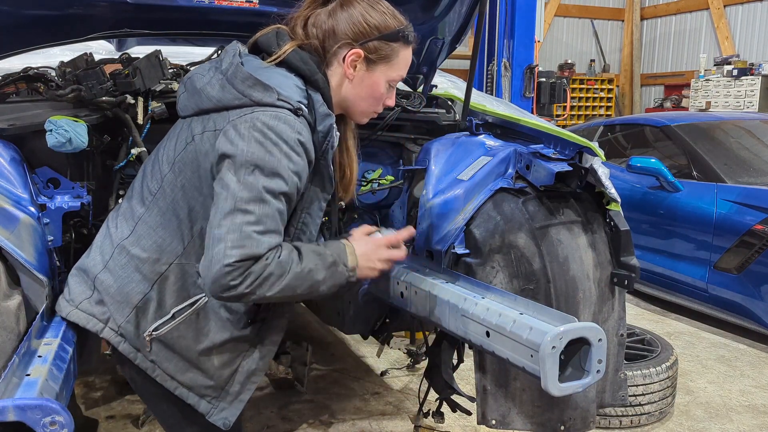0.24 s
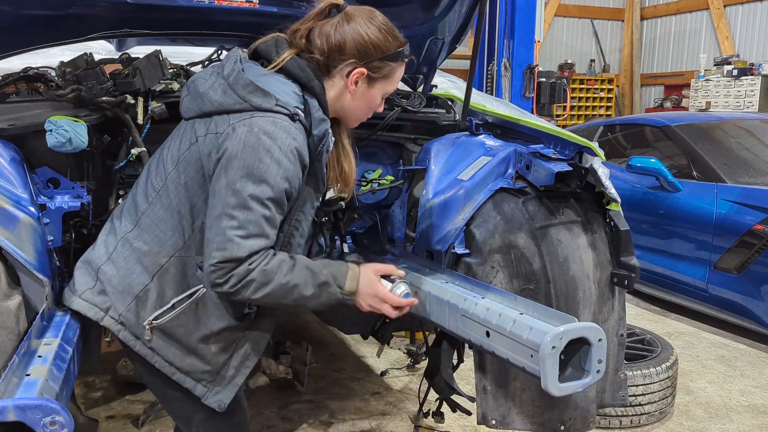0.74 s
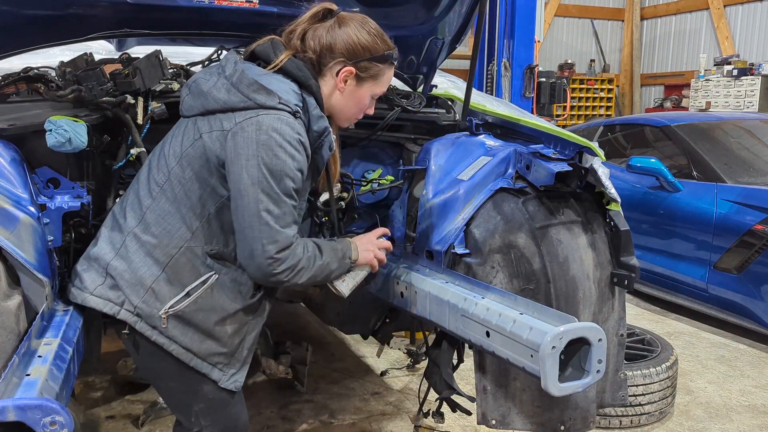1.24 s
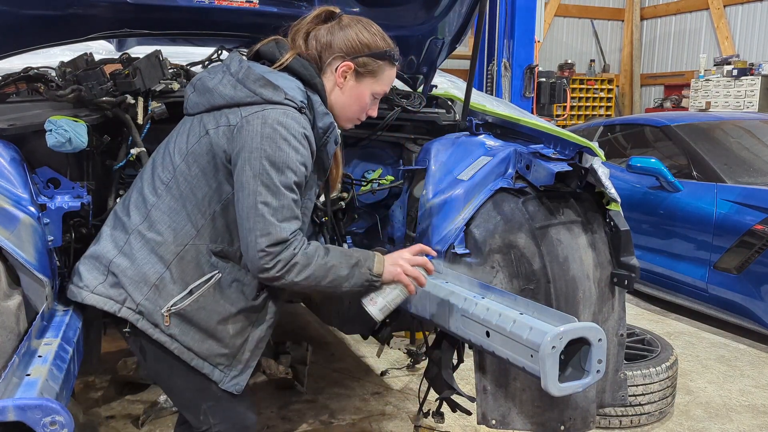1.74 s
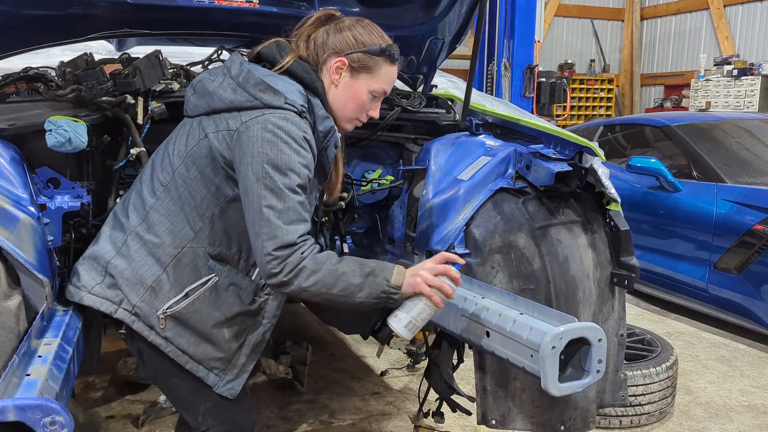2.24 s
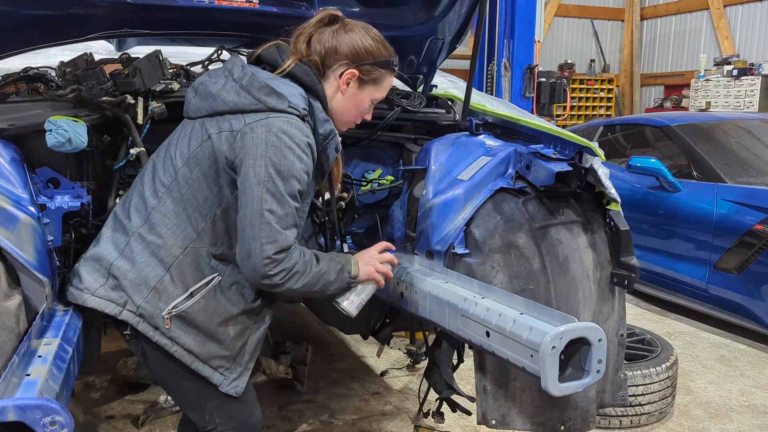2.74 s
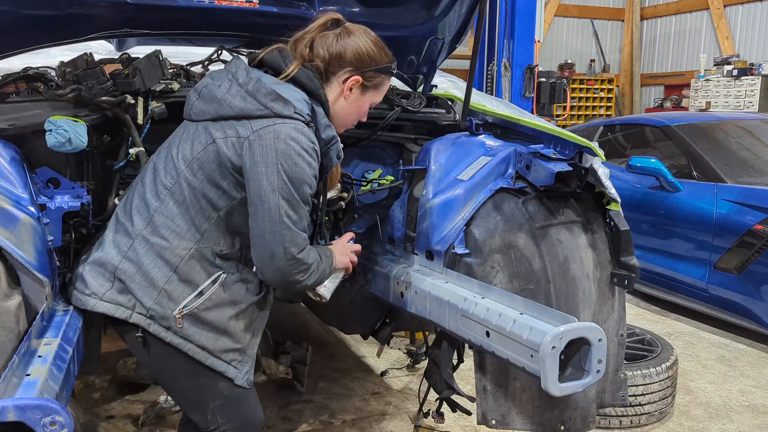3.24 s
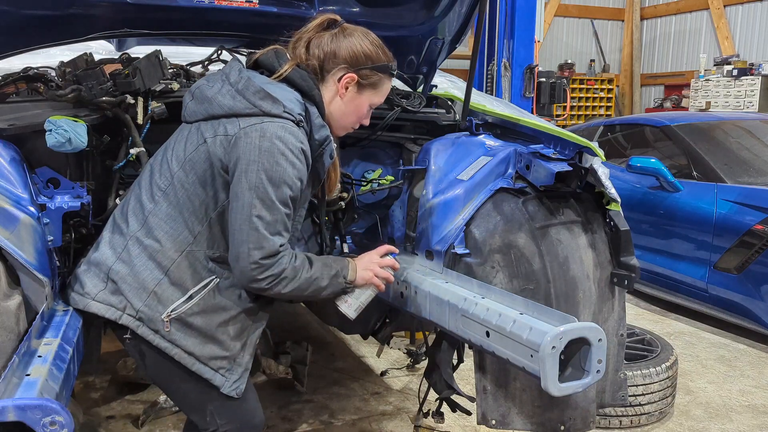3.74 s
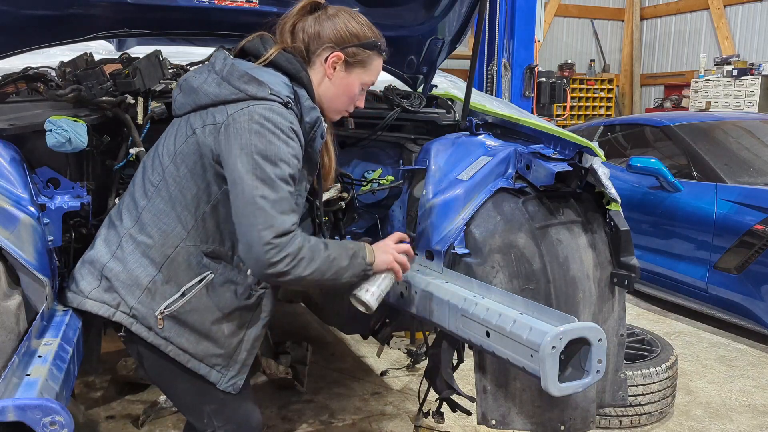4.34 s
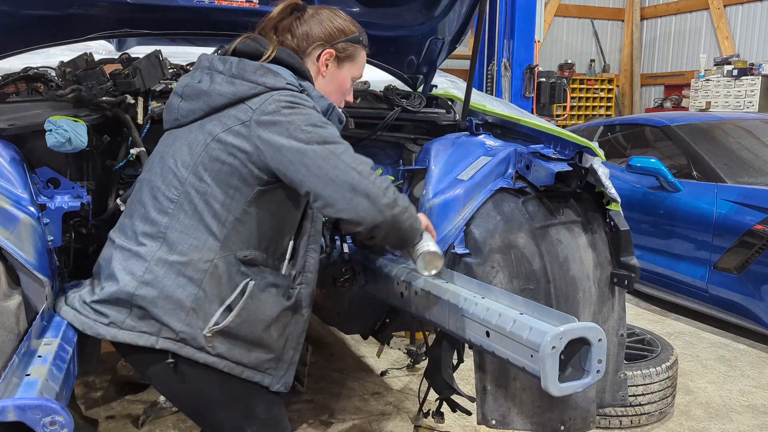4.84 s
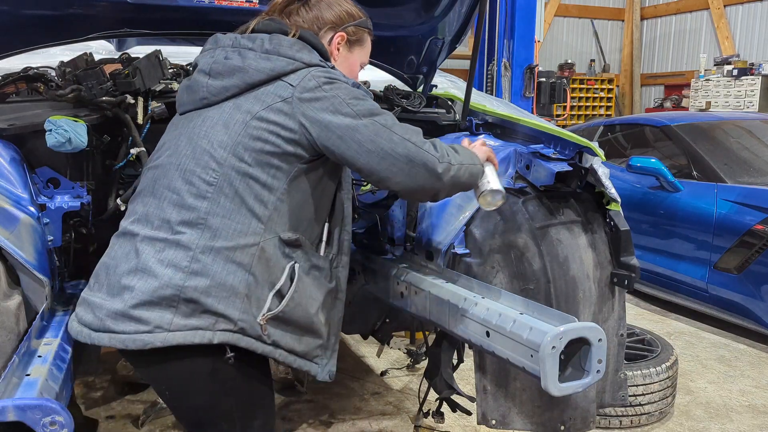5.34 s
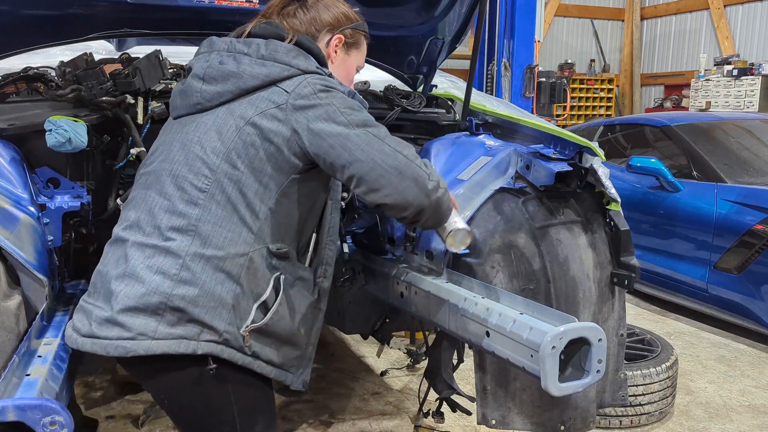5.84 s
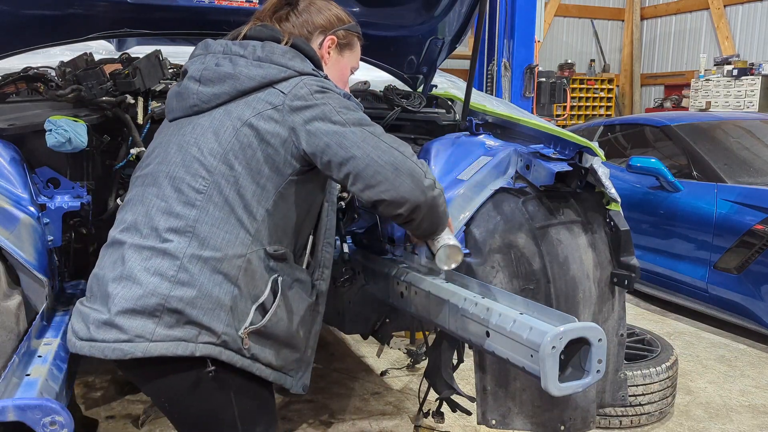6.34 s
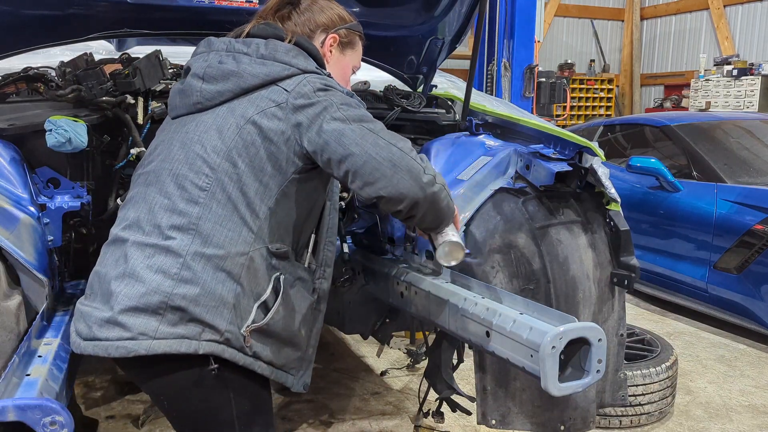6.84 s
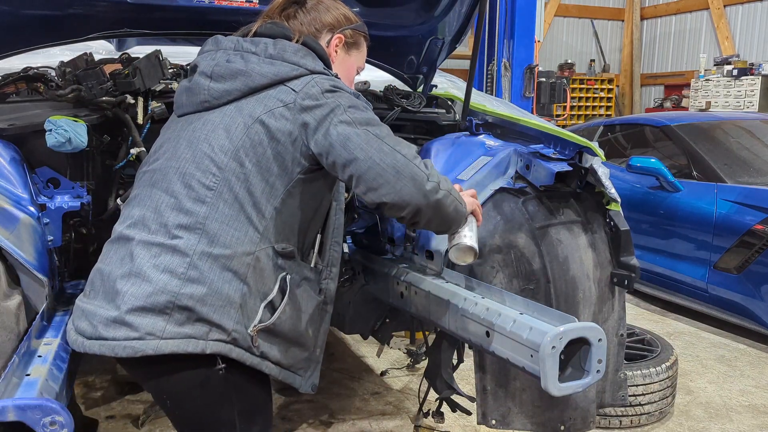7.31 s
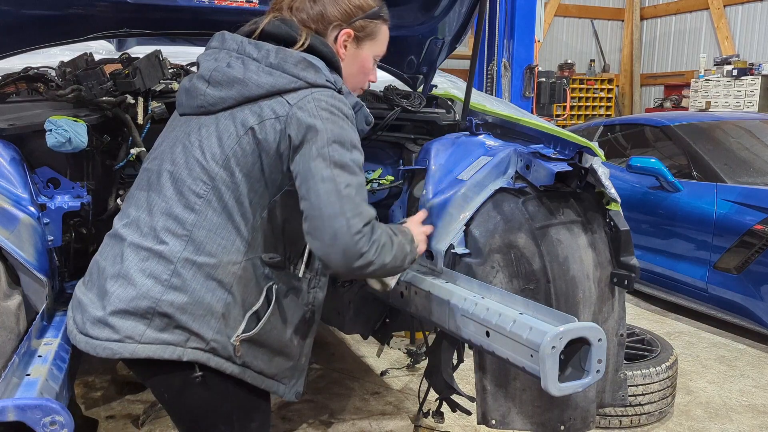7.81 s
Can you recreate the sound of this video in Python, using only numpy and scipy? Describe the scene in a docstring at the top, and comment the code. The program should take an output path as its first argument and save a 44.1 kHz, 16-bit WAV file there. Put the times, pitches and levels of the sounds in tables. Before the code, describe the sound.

Close stereo microphones catch hard, bright clacks from a shaken spray can, with quick reflections from nearby surfaces and a ringing hall tail. A final clack and tiny bounces lead into breathy, slightly fluttering paint bursts separated by short pauses. Dull shoe bumps occur between and under them. After the last short puff, scuffing soles and faint clothing ticks remain over a steady low room rumble.

```python
"""An aerosol paint can is shaken in a large workshop, its mixing pea clacking on the tin, then sprayed
in eight hissing bursts at a steel beam. Each clack is a dispersed blow with a faint ring of the tin.
The painter shifts her feet, with damped noise for soles on concrete, and her jacket rustles and ticks.
The floor and the car close by reflect each clack, the hall rings on, and a low rumble lies under it all."""
import sys
import numpy as np
from scipy import signal
from scipy.fft import rfft, irfft, next_fast_len
from scipy.io import wavfile
from scipy.ndimage import uniform_filter1d, map_coordinates

SR = 44100
rng = np.random.default_rng(int(sys.argv[2]) if len(sys.argv) > 2 else 0)


def wrap_up_sound(samples):
    """Save the sound to the file named by the first command line argument, as 16-bit audio."""
    columns = np.atleast_2d(samples).T
    # keep every value between -1 and 1, then stretch to whole-number steps
    tamed = np.clip(columns, -1, 1)
    steps = np.round(tamed * 32767).astype(np.int16)
    wavfile.write(sys.argv[1], SR, steps)


N = 355887  # samples in the scene


def amp(db):
    """Decibels to gain."""
    return 10 ** (np.asarray(db) / 20)


def unit(x):
    """Scaled to rms 1."""
    return x / np.sqrt(np.mean(x ** 2) + 1e-20)


def along(points, hz):
    """Values of (Hz, value) points, interpolated on a log frequency axis."""
    f, v = np.transpose(points)
    return np.interp(np.log(hz + 1), np.log(f + 1), v)


def wobble(rate):
    """A smooth random curve through rate random knots a second."""
    knots = rng.standard_normal(int(N * rate / SR) + 4)
    return map_coordinates(knots, [np.arange(N) * rate / SR])


def filtered(x, response):
    """x shaped by a response, given as a function of frequency in Hz."""
    m = next_fast_len(x.shape[-1] + 8192)  # spare room for the filter's ringing
    spectrum = rfft(x, m) * response(np.fft.rfftfreq(m, 1 / SR))
    return irfft(spectrum, m)[..., :x.shape[-1]]


def resonance(f, centre, width):
    """Response of one damped resonance."""
    return 1j * f * width / (centre ** 2 - f ** 2 + 1j * f * width)


def pulse(gain, size=1024):
    """The shortest causal (minimum-phase) click with the given gain over frequency."""
    cepstrum = irfft(np.log(gain(np.fft.rfftfreq(size, 1 / SR)) + 1e-9))
    folded = np.r_[cepstrum[0], 2 * cepstrum[1:size // 2]]
    return irfft(np.exp(rfft(folded, size)))


def diffuse(n):
    """Noise arriving from all around: alike left and right in the bass, nearly unrelated in the treble."""
    # Each row: frequency in Hz, likeness of left and right (1 is identical)
    alike = [(60, 0.96), (130, 0.94), (290, 0.82), (640, 0.32), (1400, 0.076), (7000, 0.045)]

    def mid_and_side(f):
        angle = np.arccos(np.clip(along(alike, f), -1, 1)) / 2
        return np.array([np.cos(angle), np.sin(angle)])

    mid, side = filtered(rng.standard_normal((2, n)), mid_and_side)
    return np.array([mid + side, mid - side])


def noise(spectrum):
    """Diffuse noise of rms 1 with the given colour."""
    return unit(filtered(diffuse(N), lambda f: amp(along(spectrum, f))))


def add(out, s, sound):
    """Mix a sound in at time s, in seconds."""
    part = out[:, max(round(s * SR), 0):][:, :sound.shape[-1]]
    part += sound[..., :part.shape[1]]


def hall(x, build=0.0024):
    """The workshop's tail: it builds up (time constant in s), then each frequency dies at its own speed."""
    # Each row: frequency in Hz, time to fall 60 dB in seconds
    decay = [(150, 1.28), (500, 1.67), (1200, 0.99), (2500, 1.11), (5000, 0.64), (9000, 0.51),
             (15000, 0.25)]
    hz, t, z = signal.stft(diffuse(SR), SR, nperseg=256)
    fade = amp(-60 * t / along(decay, hz)[:, None]) * (1 - np.exp(-t / build))
    tail = signal.istft(z * fade, SR, nperseg=256)[1]
    tail = tail / np.linalg.norm(tail[0])
    return signal.fftconvolve(np.atleast_2d(x), tail, axes=1)[:, :N]


def background(air_db=-58):
    """The rumble and faint hiss of the building, as steady noise that wavers slightly."""
    # Each row: frequency in Hz, relative level in dB per Hz
    air = [(22, -29), (45, -6.5), (60, 2.5), (88, -1.5), (135, -9.5), (250, -12.5), (450, -16), (850, -23),
           (3000, -30.5), (6400, -42.5), (8400, -30), (10000, -45), (16000, -30.5)]
    return noise(air) * amp(air_db + 0.22 * wobble(3.5))


def lingering(db=-48, t60=1.8):
    """The hall still rings with earlier shaking: coloured noise falls 60 dB in t60 seconds."""
    # Each row: frequency in Hz, relative level in dB per Hz
    colour = [(500, -6.5), (1000, -4), (2200, -1.5), (4500, -7), (9000, -40), (15000, -34)]
    return noise(colour) * amp(db - 60 * np.arange(N) / SR / t60)


def jacket(crease_db=1.5, grain_db=1.5, tick_db=-65, tick_spread_db=3, tick_t60=0.02, count=14):
    """Stiff cloth rubs in creases of fine grains with each swing of the arm; its fittings tick."""
    # Each row: frequency in Hz, relative level in dB per Hz
    cloth = [(300, -22), (1500, 1.5), (4000, -4.5), (8500, -6), (10500, -9.5), (15000, -10.5)]
    # Each row: fastest moment of the swing in seconds, level in dB,
    # time to swell or fade by a factor e in seconds
    swings = [(.1, -49.5, 0.77), (3.25, -69.5, 0.46), (4.62, -60.5, 0.16), (6.2, -70, 0.29), (7.65, -66, 1)]
    # The fittings tick while the arm comes back: from and to, in seconds
    ticking = (7.45, 8.0)
    t = np.arange(N) / SR
    rubbing = sum(amp(db) * np.exp(-np.abs(t - s) / swell) for s, db, swell in swings)
    texture = amp(crease_db * wobble(35) + grain_db * wobble(600))
    out = unit(noise(cloth) * texture) * rubbing
    t = t[:SR // 20]
    for s in rng.uniform(*ticking, size=count):
        bright = np.diff(diffuse(len(t) + 1))  # differencing favours the treble
        add(out, s, bright * amp(rng.normal(tick_db, tick_spread_db) - 60 * t / tick_t60))
    return out


def bump(hz, width, rise, t60):
    """A soft contact: noise swells and dies in one broad resonance."""
    t = np.arange(SR // 2) / SR
    press = amp(-60 * t / t60) * (1 - np.exp(-t / rise))
    body = press * filtered(diffuse(len(t)), lambda f: resonance(f, hz, width) ** 2)
    return unit(body) * np.sqrt(np.mean(press ** 2))


def drag(hold, level_db, pitch, grit_db):
    """A sole slips unevenly over the concrete, and the noise sounds through its resonances."""
    # Each row: centre in Hz and width in Hz, both at pitch ratio 1, relative level in dB
    modes = [(298, 110, -7), (475, 120, -3.5), (722, 120, 2), (960, 160, -0.5), (1500, 950, -12)]
    rise_s, fade_db_per_s = 0.043, 100
    t = np.arange(N) / SR

    def sole(f):
        # neighbouring resonances have opposite signs
        return sum((-1) ** k * amp(db) * resonance(f / pitch, hz, width) ** 2
                   for k, (hz, width, db) in enumerate(modes))

    slips = diffuse(N) * amp(grit_db * wobble(121))
    fade = amp(level_db - fade_db_per_s * np.maximum(t - rise_s - hold, 0))
    return unit(filtered(slips, sole)) * np.minimum(t / rise_s, 1) * fade


def feet(grit_db=2.5, hall_db=-6):
    """Soft thuds, scuffs and squeaks as bumps of noise, and a sole that drags in small uneven slips."""
    # A hand bumps the can (the first row), then shoes and knees on the floor.
    # Each row: start in seconds, level in dB, time to fall 60 dB in seconds
    thuds = [(0.894, -37, 0.045), (2.0, -57, .25), (2.228, -52, .26), (2.851, -45.5, 0.15),
             (3.292, -47.5, 0.12), (3.495, -54.5, 0.37), (4.12, -50.5, 0.54), (4.78, -58, 0.54),
             (5.36, -53, 0.27), (6.77, -54.5, 0.16), (7.1, -48, 0.63), (7.455, -45, 0.47)]
    # A sole scuffs or squeaks. Each row: start in seconds, level in dB, centre in Hz
    scuffs = [(3.297, -45.5, 530), (3.297, -52.5, 1710), (7.166, -41.5, 2030), (7.424, -47, 420),
              (7.44, -53.5, 1890), (7.568, -46.5, 310), (7.638, -48.5, 560), (7.638, -52.5, 2340),
              (7.71, -40, 466)]
    # A sole drags. Each row: start in seconds, hold in seconds, level in dB, pitch ratio
    drags = [(7.425, 0.039, -56, 0.648), (7.708, 0.045, -49.5, 1)]
    out = np.zeros((2, N))
    for s, db, t60 in thuds:
        # long thuds also rise slowly
        add(out, s, amp(db) * bump(hz=175, width=210, rise=0.016 * t60, t60=t60))
    for s, db, hz in scuffs:
        width = 790 * np.sqrt(hz / 1000)  # Hz
        add(out, s, amp(db) * bump(hz, width, rise=0.0064, t60=0.21))
    for s, hold, level_db, pitch in drags:
        add(out, s, drag(hold, level_db, pitch, grit_db))
    return out + amp(hall_db) * hall(out.mean(axis=0))


def patchy(x, depth_db):
    """Uneven noise: small random patches of time and frequency swell and fade."""
    z = signal.stft(x, nperseg=512)[2]
    field = rng.standard_normal(z.shape[1:])
    field = uniform_filter1d(uniform_filter1d(field, size=3, axis=0), size=4, axis=1)
    return signal.istft(z * amp(depth_db * unit(field)), nperseg=512)[1][:, :N]


def spray(flutter_db=.5, spit_db=0.15, splash_db=-5, hall_db=-9):
    """The jet hisses at the nozzle and rushes, lower, on the steel; droplets make the flow flutter."""
    # The valve is held down while the hand sweeps the nozzle. Each row: from and to in seconds,
    # level in dB, change over the sweep in dB
    bursts = [(1.446, 1.927, -44, 4.5), (2.337, 3.153, -45.5, -5), (3.381, 4.061, -45, 0.5),
              (4.751, 5.411, -45.5, 0), (5.58, 6.108, -46, -0.2), (6.306, 6.614, -47.5, -1),
              (6.766, 6.965, -47.4, -1.5), (7.108, 7.301, -46, 1)]
    # The jet at the left and right microphone. Each row: frequency in Hz, relative level in dB per Hz
    jet_left = [(4000, -49), (9500, -20), (11000, -8), (12500, -2), (14500, -1.5), (16000, -4.5)]
    jet_right = [(4000, -17.5), (7000, -13), (8400, -5), (10000, -16.5), (11000, -8.5), (12300, -15),
                 (14000, -8), (16000, -11)]
    # The spray striking the steel. Each row: frequency in Hz, relative level in dB per Hz
    splash = [(200, -16), (850, -9), (1400, -4.5), (2200, -3), (3100, -.5), (3900, -1.5), (5000, .5),
              (7200, -1), (9500, -2.5), (16000, -26)]
    t, flow = np.arange(N) / SR, np.zeros(N)
    opening, closing = .007, .018  # time constant and length of the closing ramp, s
    for start, stop, db, sweep_db in bursts:
        valve = (1 - np.exp(-np.maximum(t - start, 0) / opening)) * np.clip((stop - t) / closing, 0, 1)
        flow += valve * amp(db + sweep_db * np.interp(t, [start, stop], [-.5, .5]))
    flow *= amp(flutter_db * wobble(55) + spit_db * wobble(900))
    jet = unit(filtered(diffuse(N), lambda f: amp([along(jet_left, f), along(jet_right, f)])))
    rush = noise(splash) * amp(splash_db + 0.95 * wobble(9))
    hiss = patchy(flow * (jet + rush), depth_db=2.0)
    return hiss + amp(hall_db) * hall(hiss)


def nearby(echo_db=-1.0, wall_s=0.018, wall_db=-14, scatter_db=-2, scatter_t60=0.057, dull_db=-5, bright_db=5):
    """Direct sound, two distinct echoes and a scatter off the car that favours the treble."""
    t = np.arange(SR // 8) / SR
    # the first echo's delay changes as the can swings
    echo_s = rng.uniform(.0028, .0036)
    scatter = diffuse(len(t)) * amp(-60 * t / scatter_t60) * (1 - np.exp(-t / echo_s)) ** 2
    scatter *= amp(scatter_db) / np.linalg.norm(scatter[0])
    colour = [(2000, dull_db), (5000, 1), (10000, bright_db)]  # Hz, dB
    paths = filtered(scatter, lambda f: amp(along(colour, f)))
    for s, db in [(0, 0), (echo_s, echo_db), (wall_s, wall_db)]:
        paths[:, round(s * SR)] += amp(db)
    return paths


def contact(skid, chatter=0.096):
    """One blow, then the pea chatters along the wall for about skid seconds; unit energy."""
    t = np.arange(SR // 25) / SR
    force = chatter * rng.standard_normal(len(t)) * np.exp(-t / max(skid, 1e-4))
    force[0] = 1
    force = force / np.linalg.norm(force)
    lag = .0008  # delay at 1 kHz, s
    # bending waves in thin tin are dispersive: the treble arrives first
    return filtered(force, lambda f: np.exp(-4j * np.pi * lag * np.sqrt(1000 * f)))


def settling(count=3):
    """With the can upright the pea bounces to rest, each bounce sooner and softer; rows as for the hits."""
    first_s, flight_s, shrink = 1.451, .068, .75  # first touch, first flight, each flight over the one before
    level_db, loss_db, tilt_db, skid_s = -50, 3.5, -11, 0.0044  # loss a bounce; tilt per octave
    return [(first_s + flight_s * np.sum(shrink ** np.arange(k)), level_db - loss_db * k, tilt_db, skid_s)
            for k in range(count)]


def rattle(clack_db=21, ring_db=-50, ring_t60=0.61, hall_db=-3, ripple_db=1.9):
    """Each blow of the pea gives a short clack, brighter or duller by where it lands, and a faint tin ring."""
    # The pea hits the can. Each row: time in seconds, relative level in dB,
    # brightness in dB per octave, skid along the wall in seconds
    hits = [(.031, -29.5, -4, 0.0017), (0.088, -39.5, -2, .001), (.11, -47, 1, .001),
            (0.1327, -44.5, -4, .001), (0.2173, -47, 2, .001), (0.2273, -34, -3.5, 0.0076),
            (0.2496, -41.5, 0, .001), (.345, -29.5, -3, 0.0015), (.435, -46, -6, .008),
            (0.6241, -33, -1, 0.018), (.678, -45, -4.5, 0.0074), (.7625, -54, 2, .002),
            (0.7696, -29, -2, 0.00042), (0.7992, -41, -3, 0.0009), (0.865, -34.5, -7, 0.00087),
            (0.8849, -30.5, 0.5, 0.0011), (0.8962, -33, 2.5, 0.0028), (0.934, -40.5, -0.5, 0.00089),
            (1.0341, -42, -5.5, 0.002), (1.057, -34.5, -3, 0.0045), (1.3681, -38, -1.5, .002)]
    # Colour of a clack. Each row: frequency in Hz, relative level in dB
    clack_colour = [(100, -33), (550, -7), (760, -0.5), (1030, 6.5), (1400, 5.5), (2200, 7.5), (2900, 3.5),
                    (4400, 7), (5300, 1.5), (9000, -3), (15500, -5)]
    # The tin rings on. Each row: frequency in Hz, relative level in dB
    tin = [(1063, 0), (1314, -19), (1796, 1.5), (2090, -3), (2145, -2.5), (2353, 7), (3130, 5), (3733, 0),
           (4176, -9), (4454, -5)]
    out, t = np.zeros((2, N)), np.arange(SR) / SR
    for s, level_db, tilt_db, skid in hits + settling():
        # the brightness tilts about 4.2 kHz and levels off outside these two points
        spot = [(hz, level_db + tilt_db * np.log2(hz / 4200)) for hz in (2200, 10000)]
        ripple = np.c_[np.geomspace(800, 16000, 24), rng.normal(0, ripple_db, size=24)]
        click = pulse(lambda f: amp(clack_db + along(clack_colour, f) + along(spot, f) + along(ripple, f)))
        clack = signal.fftconvolve(contact(skid), click)
        add(out, s, signal.fftconvolve(clack[None], nearby(), axes=1))
        add(out, s, amp(hall_db) * hall(clack))
        # sloshing paint makes the ring waver
        slosh = np.cumsum(rng.standard_normal(SR)) * np.sqrt(30 / SR)
        for hz, db in tin:
            t60 = ring_t60 * min(1, 2200 / hz)  # high modes die sooner
            phase = 2 * np.pi * hz * t + slosh * hz / 2200 + rng.uniform(0, 2 * np.pi, (2, 1))
            ring_level = clack_db + ring_db + along(spot, hz) + db
            add(out, s, amp(ring_level - 60 * t / t60) * np.sin(phase))
    return out


def scene():
    """Everything heard in the workshop."""
    return background() + lingering() + jacket() + feet() + spray() + rattle()


def record(dry):
    """The microphones' band limit: nothing is kept from 15.78 kHz up."""
    return filtered(dry, lambda f: f < 15780)


dry = scene()
out = record(dry)
wrap_up_sound(out)
```